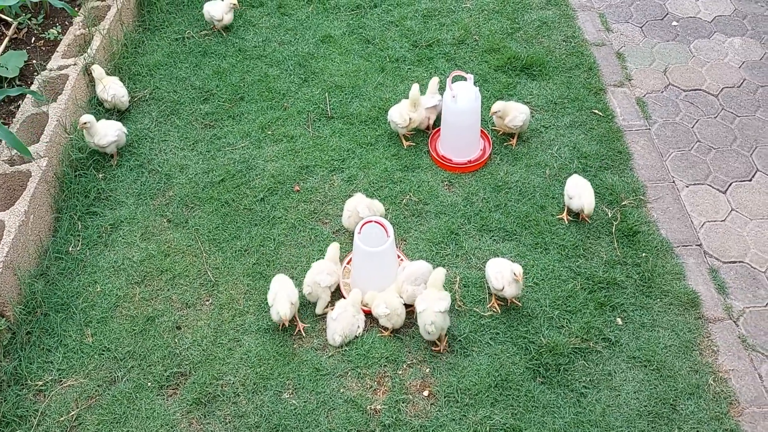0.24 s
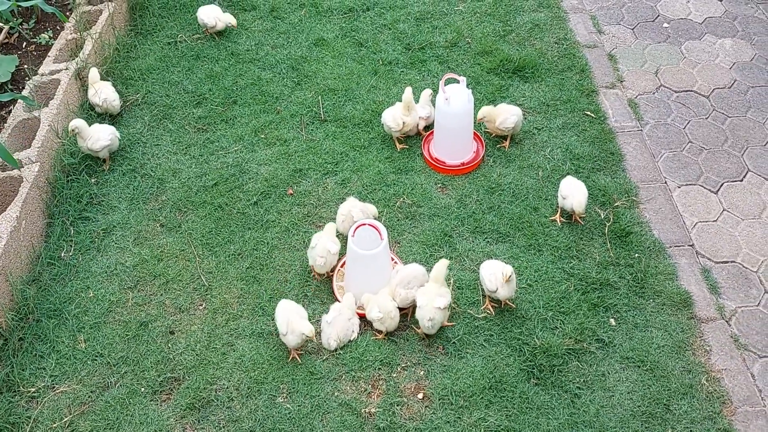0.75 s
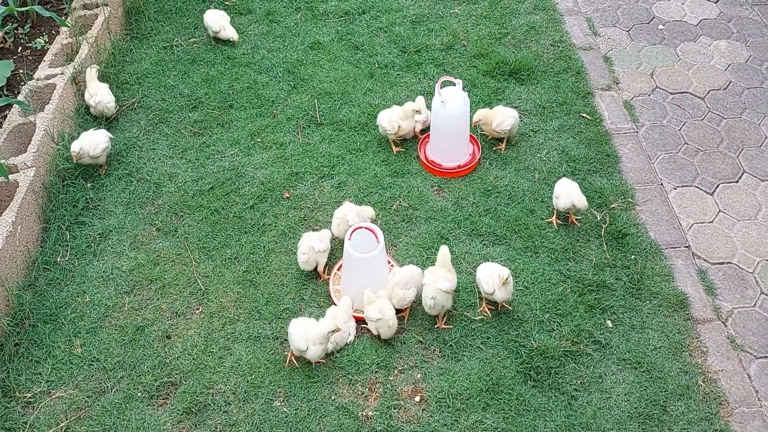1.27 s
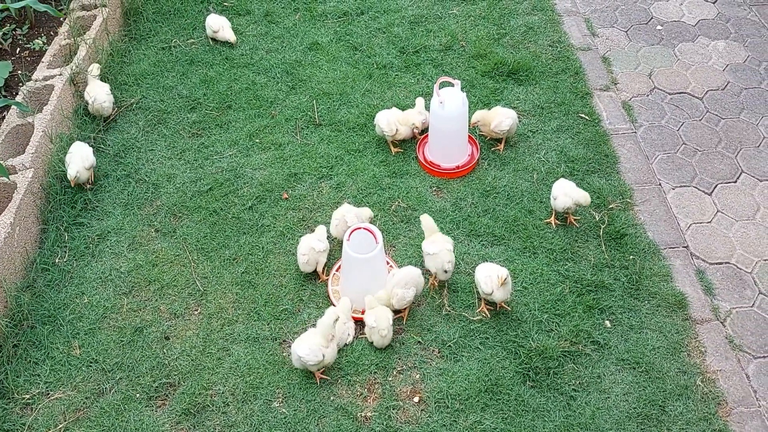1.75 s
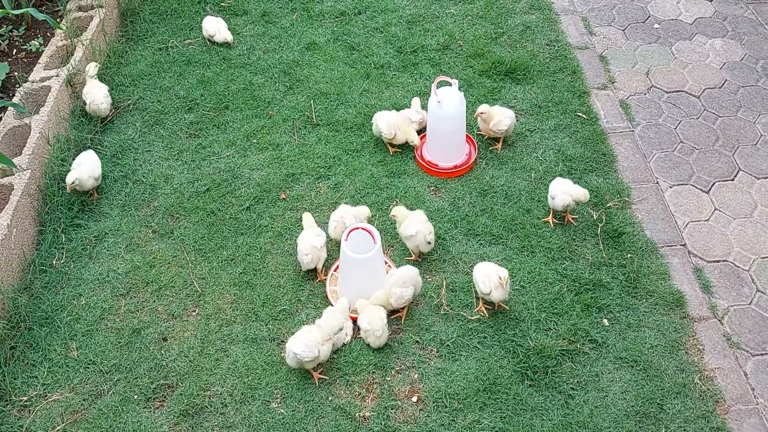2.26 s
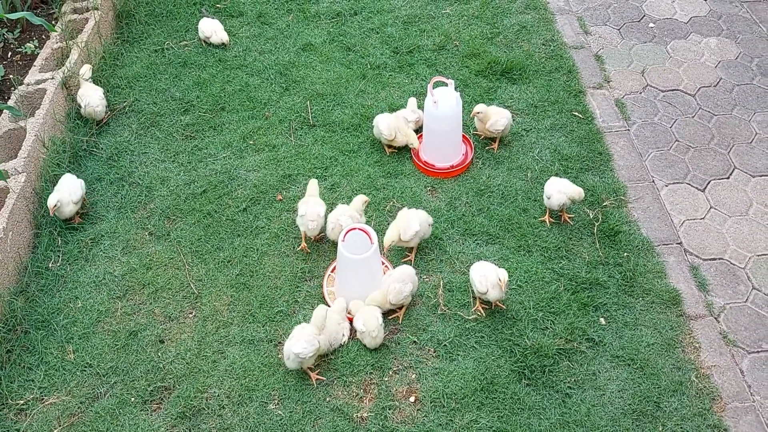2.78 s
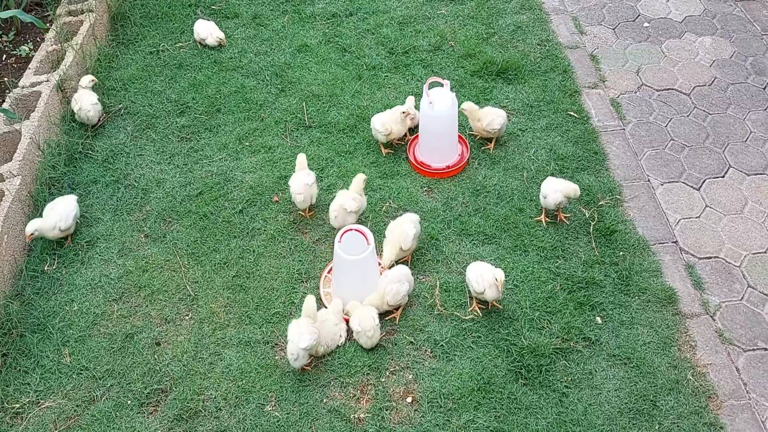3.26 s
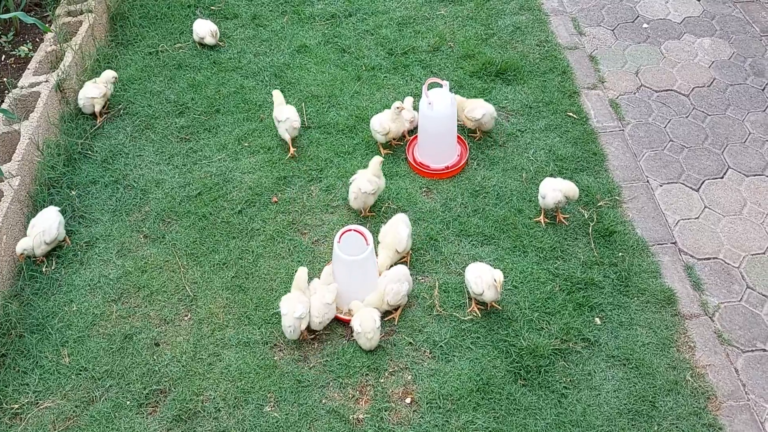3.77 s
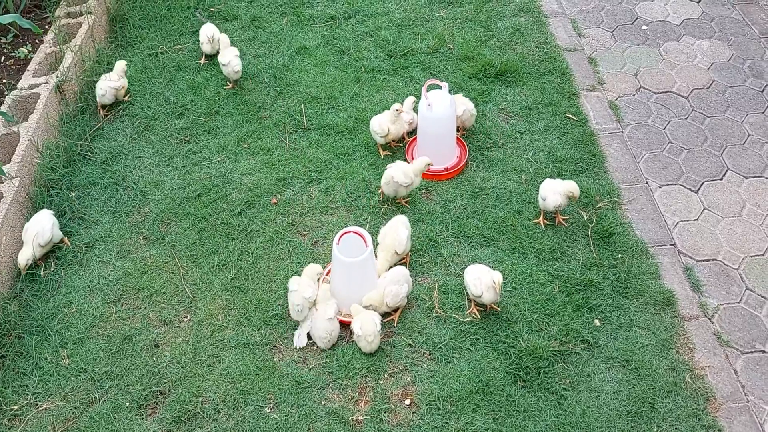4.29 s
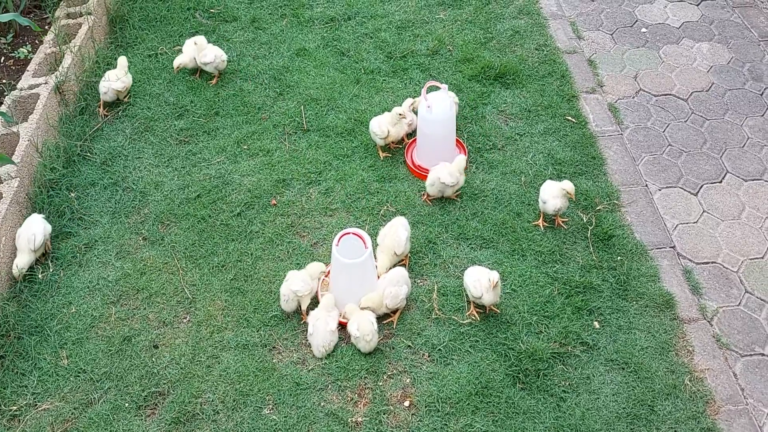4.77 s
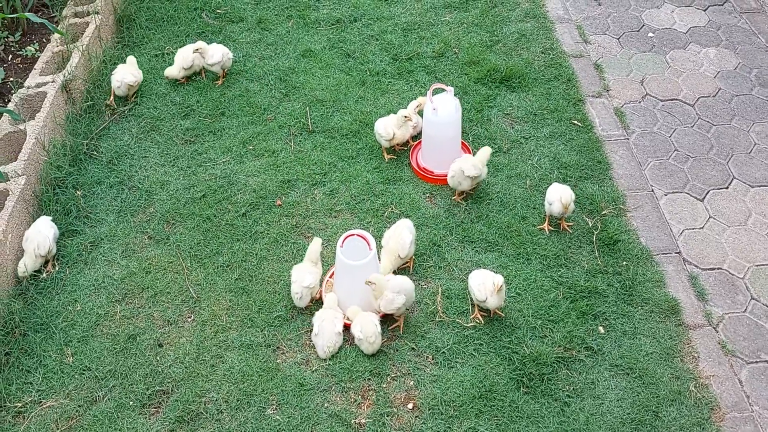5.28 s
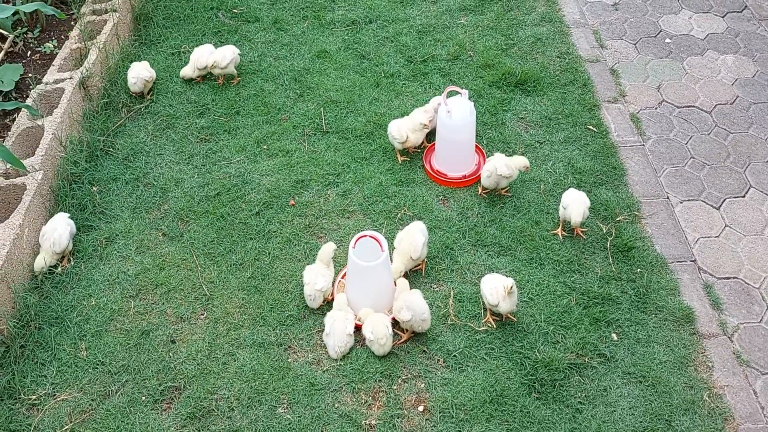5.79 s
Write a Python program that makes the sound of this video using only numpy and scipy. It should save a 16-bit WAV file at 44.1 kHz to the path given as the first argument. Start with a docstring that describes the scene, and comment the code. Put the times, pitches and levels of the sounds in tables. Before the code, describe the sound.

Thin falling peeps and quick rising chirps, light dry beak taps, and bursts of low wind buffeting in a small walled yard.

```python
"""Chicks in a walled yard

Young chicks peep and peck at a plastic feeder on a lawn, a few metres from a hand-held phone.
Their calls, long falling peeps, short rising chirps and one close arched pip, are gliding sine tones
with a faint octave; taps are damped modes with a noise scrape, and walls add discrete and diffuse echoes.
Gusts and a light breeze rumble in lumps as low noise, separate at the two microphone ports,
over tugged grass, a brief low hum, a soft airy hiss and the dull shaped noise of distant traffic."""
import sys
import numpy as np
from scipy import signal
from scipy.fft import rfft, irfft, next_fast_len
from scipy.io import wavfile
from scipy.ndimage import uniform_filter1d

SR = 44100
rng = np.random.default_rng(int(sys.argv[2]) if len(sys.argv) > 2 else 0)


def put_to_file(sound):
    """Save the sound as 16-bit audio at rate SR, in the file named by the first command-line argument."""
    columns = np.atleast_2d(sound).T  # one column per channel
    safe = np.clip(columns, -1, 1)
    whole_steps = np.round(safe * 32767)
    wavfile.write(sys.argv[1], SR, whole_steps.astype(np.int16))


N = 266231
TIME = np.arange(N) / SR
PORTS = np.array([[.5], [-.5]])  # signs of the left and right port

# falling peeps: start t/s, length/s, trailing end/s, top f/Hz, end f/Hz, relative level/dB, swell/dB,
#   opening scoop (share of the pitch, negative from above), share of the fall spent sagging (0-1),
#   place of the drop in the length (0-1), closing curl/(Hz/s), left minus right/dB, lead at the left port/ms
FALLING_PEEPS = [(.297, .095, .027, 3610, 2500, -45, 12, -.05, .62, .87, 0, 1, -.072),
                 (1.806, .069, .003, 3490, 2770, -40, 15, .15, .5, .8, 0, 0, -.067),
                 (2.347, .106, .028, 3790, 2520, -42.5, 19, 0, .75, .76, 13000, 0, -.065),
                 (3.396, .022, 0, 3980, 3450, -63.5, 0, 0, .1, .42, 0, 0, 0)]
# rising chirps: start t/s, length/s, low f/Hz, high f/Hz, relative level/dB,
#   opening height above the low pitch (share of it), share held low (0-1), swell/dB,
#   left minus right/dB, lead at the left port/ms
RISING_CHIRPS = [(.496, .029, 2270, 2890, -47, .02, .1, 17, .6, .052),
                 (1.41, .037, 2490, 3050, -43, 0, .2, 9, 2, .06),
                 (3.122, .012, 2720, 3000, -61, 0, 0, 4, 0, 0),
                 (3.396, .037, 3000, 3950, -49.5, .075, .28, 16, 1, .036),
                 (3.575, .033, 2993, 3760, -43.8, .012, .48, 1.5, 2.5, .064),
                 (4.098, .0166, 2295, 3100, -58, 0, .15, 5, 2, -.12),
                 (4.291, .032, 2270, 2800, -50, .014, .15, 8, 2, .08),
                 (4.598, .024, 3060, 3520, -59, .0065, 0, 5, 1.5, .03),
                 (5.785, .015, 2470, 2820, -58, 0, 0, 7, 1.2, 0)]
# one loud arched pip from close by: start t/s, soft low opening/s, full arch/s, low f/Hz, top f/Hz,
#   level/dB, octave overtone/dB, left minus right/dB
CLOSE_PIP = (5.0655, .0088, .028, 2270, 2950, -42.7, -12.5, 2)
# beak taps: t/s, relative level/dB, ring f/Hz
PECKS = [(.699, -40, 2900), (2.8817, -31, 2930), (3.3485, -39.5, 2320), (3.7935, -43, 2290),
         (4.119, -42, 2400), (4.8765, -38.5, 3000), (4.9408, -33, 2320), (5.4575, -45, 2700),
         (5.9127, -37.5, 2510)]
# modes that a tap rings with: multiple of the ring pitch, level/dB, t60/s
TAP_MODES = [(.69, -14, .004), (1, 0, .004), (1.25, -13, .003)]
# grass blades tugged and trodden: t/s, level/dB, centre f/Hz, t60/s
GRASS_TUGS = [(.281, -49, 6900, .035), (4.402, -51, 12500, .05), (4.675, -59, 12000, 0.065)]
# wall echoes: delay/s, level at the left port/dB, level at the right port/dB
WALL_ECHOES = [(.0082, -12, -20), (.0143, -17, -10), (.0205, -20, -22), (.033, -27, -27)]
# gusts on the ports: start t/s, length/s, level/dB, left minus right/dB
GUSTS = [(-.01, 0.082, -27, -1.5), (0.086, 0.086, -51, -20), (0.313, 0.045, -53, 6), (.93, 0.027, -50, 7),
         (0.993, 0.03, -47.5, 5), (1.225, 0.33, -46, -21), (1.624, 0.2, -53.5, -16),
         (1.794, 0.092, -42, -12), (1.985, 0.081, -53.5, -1), (2.385, .17, -53, 2), (2.795, .02, -54, 1),
         (3.273, .22, -54.5, 0), (4.225, .11, -47.5, -3.5), (4.446, 0.074, -37, 0.5),
         (4.63, 0.17, -50.5, 7), (4.869, 0.03, -34.5, 1), (4.944, 0.05, -30.5, -0.5),
         (5.022, .11, -39, 0.5), (5.15, .12, -42, -6), (5.33, 0.14, -52, -15), (5.754, 0.066, -46, -8.5),
         (5.991, .05, -45, -9)]
# the light breeze between gusts: t/s, level/dB
BREEZE = [(0, -64), (.5, -69.5), (.95, -59), (1.12, -70), (1.9, -56), (2.2, -71), (2.72, -79), (3.0, -59),
          (3.8, -57), (4.4, -52.5), (4.8, -55), (5.5, -53.5), (5.9, -60.5)]
# spectrum of the wind noise: f/Hz, relative level per Hz/dB
WIND_COLOUR = [(20, -4), (40, -4), (65, 4), (125, -.5), (190, -11), (250, -9.5), (300, -15), (400, -22.5),
               (700, -42), (1500, -52)]
# course of the distant traffic: t/s, relative level/dB
TRAFFIC_SWELL = [(0, -53), (.2, -64.5), (.95, -63), (1.52, -63.5), (1.68, -81), (1.86, -62), (2.03, -79),
                 (2.5, -69.5), (2.76, -78), (2.93, -72.5), (2.985, -54.5), (3.08, -62), (3.35, -66.5),
                 (3.45, -73), (3.95, -74), (4.3, -66.5), (4.65, -76), (5.55, -65), (6.04, -77.5)]
# spectrum of the traffic wash: f/Hz, relative level per Hz/dB
TRAFFIC_COLOUR = [(60, -21), (190, -7.5), (280, -0.5), (345, 3), (430, 0.5), (560, -5.5), (820, -4.5),
                  (1050, -14), (1400, -23), (4000, -43)]
# a brief low hum: start t/s, length/s, f/Hz, level/dB
LOW_HUM = (2.28, .31, 65, -54)
# course of the hiss: t/s, relative body level/dB, relative treble level/dB
AIR_SWELL = [(0.0, -58, -61.5), (0.15, -61.5, -63.5), (1.51, -63, -66.5), (1.7, -66.5, -70.5),
             (1.83, -62, -66.5), (2.24, -65.5, -69), (2.45, -63, -68.5), (2.74, -67.5, -72.5),
             (2.98, -64.5, -69.5), (3.63, -65.5, -64.5), (4.0, -67.5, -70), (4.39, -63.5, -68.5),
             (4.84, -66.5, -68.5), (5.01, -61.5, -65), (5.43, -63.5, -66), (6.04, -67, -71)]
# spectrum of the hiss: f/Hz, relative level per Hz/dB
AIR_COLOUR = [(150, 2.5), (1000, 0), (2500, 1.5), (4700, 0.5), (6000, -2.5), (7600, -0.45), (9400, -6.5),
              (12400, -2.5), (14500, -6), (16000, -7)]

# falling peeps
SCOOP_S, DROP_S, SAG_POWER = .007, .018, 1.8
CREST_SHARE, PEEP_FADE_DB, TRAIL_FADE_DB = .84, 8, 13
# the upward flick of a chirp, the arch of the pip
FLICK_POWER, PIP_ARCH_POWER, PIP_SWELL_POWER = 1.7, .65, 1.4
# the yard: reverberation time, and the share of the close sounds that excites the walls
YARD_T60_S, CLOSE_YARD_SHARE = .2, .55
# wind and traffic
GUST_ATTACK_S, GUST_RELEASE_S, BREEZE_PAN_DB = .01, .02, 4.5
TRAFFIC_WAVER_DB, TRAFFIC_STRAND_DB = 2.0, 2.2
# upper band limit of the phone
TOP_HZ = 15800


def falling_peep(start, length, trail, top_hz, end_hz, db, swell_db, scoop, sag, drop_at,
                 curl_hz_per_s, pan_db, lead_ms):
    """Frequency modulation: the pitch scoops, sags ever faster, slips down a step and may curl back."""
    def pitch(age):
        """Superposed glides: a sag and a drop, bent by the opening scoop and the closing curl."""
        progress = np.minimum(age / length, 1)
        drop = ease((age - drop_at * length) / DROP_S + .5)
        fall = top_hz + (end_hz - top_hz) * (sag * progress ** SAG_POWER + (1 - sag) * drop)
        opening = 1 - scoop * np.maximum(1 - age / SCOOP_S, 0) ** 2
        return fall * opening + curl_hz_per_s * np.maximum(age - length, 0)

    def level(age):
        """Amplitude envelope: swell to the crest, let go, die away."""
        swell = np.interp(age / length, [0, CREST_SHARE, 1], undb([-swell_db, 0, -PEEP_FADE_DB]))
        trailing = np.maximum(age - length, 0) / max(trail, 1e-3)
        return db + 20 * np.log10(swell) - TRAIL_FADE_DB * trailing

    return whistle(start, length + trail, pitch, level, pan_db, lead_ms, octave_db=-31)


def rising_chirp(start, length, low_hz, high_hz, db, opening, held, swell_db, pan_db, lead_ms,
                 crest=0.8, fade_db=3):
    """Frequency modulation: a short note settles low, swells and flicks upward."""
    def pitch(age):
        """Two glides in turn: down to the low pitch, then up to the high one."""
        progress = age / length
        settling = 1 - ease(progress / max(held, .01))
        return low_hz * (1 + opening * settling) + (high_hz - low_hz) * glide(progress, held)

    def level(age):
        """Amplitude envelope: straight lines in dB up to the crest and down again."""
        return db - np.interp(age / length, [0, crest, 1], [swell_db, 0, fade_db])

    return whistle(start, length, pitch, level, pan_db, lead_ms)


def arched_pip(start, opening, length, low_hz, top_hz, db, octave_db, pan_db, swell_db=20):
    """Common drive: after a soft low opening one push of effort lifts pitch and level together."""
    def effort(age):
        """Half-sine drive over the full arch."""
        return np.sin(np.pi * np.clip((age - opening) / length, 0, 1))

    def pitch(age):
        """Pitch rising with a power of the effort."""
        return low_hz + (top_hz - low_hz) * effort(age) ** PIP_ARCH_POWER

    def level(age):
        """Level rising with the effort from a soft floor."""
        return db + 20 * np.log10(np.maximum(effort(age) ** PIP_SWELL_POWER, undb(-swell_db)))

    # the note ends before the arch is complete
    return whistle(start, opening + .88 * length, pitch, level, pan_db, 0, octave_db, edge_s=.004)


def whistle(start, length, pitch_hz, level_db, pan_db, lead_ms, octave_db=-26, edge_s=.005,
            waver=0.007, flutter_db=1.3):
    """Phase integration: a nearly pure tone of the syrinx whose pitch and level are laws of its age."""
    span = (TIME > start - edge_s) & (TIME < start + length + edge_s)
    age = TIME[span] - start
    sounding = np.clip(age, 0, length)
    pitch = pitch_hz(sounding) * (1 + waver * walk(400)[span])
    gate = ease(np.minimum(age, length - age) / edge_s + 1)
    # the arrival lead becomes a phase difference between the ports
    phase = 2 * np.pi * (np.cumsum(pitch) / SR + PORTS * pitch * lead_ms / 1000)
    level = level_db(sounding)
    # the octave only comes through near the loudest moment
    octave = undb(octave_db + level - level.max())
    tone = np.sqrt(2) * (np.sin(phase) + octave * np.sin(2 * phase))
    out = np.zeros((2, N))
    out[:, span] = tone * gate * undb(level + flutter_db * walk(250)[span]) * pan(pan_db)
    return out


def taps(rows, scrape_db=-11, scrape_s=0.0024):
    """Damped modes: each tap rings for a few cycles while the beak scrapes briefly over the grain."""
    out, t = np.zeros((2, N + SR)), np.arange(SR // 40) / SR
    onset = 1 - np.exp(-t / 0.00016)
    for s, db, hz in rows:
        ring = sum(undb(mode_db - 60 * t / t60) * np.sin(2 * np.pi * hz * multiple * t)
                   for multiple, mode_db, t60 in TAP_MODES)
        scrape = unit(band(rng.standard_normal((2, len(t))), 0.53 * hz, 1.6 * hz))
        scrape = scrape * np.exp(-t / scrape_s)
        i = max(int(s * SR), 0)
        out[:, i:i + len(t)] += (ring + undb(scrape_db) * scrape) * onset * undb(db)
    return out[:, :N]


def nibbling(count=30, level_db=-54, spread_db=3, ring_hz=3000):
    """Random impacts: the rest of the flock picks faintly at grain and grass."""
    rows = []
    for when, strength, size in rng.random((count, 3)):
        db = level_db + spread_db * (2 * strength - 1)
        rows.append((when * N / SR, db, ring_hz * 2 ** (1.54 * size - .6)))
    return taps(rows)


def grass(crackle_db=3):
    """Decaying noise: each tug tears a few fibres in a short, bright, uneven rustle."""
    out = np.zeros((2, N))
    for s, db, hz, t60 in GRASS_TUGS:
        age = np.maximum(TIME - s, 0)
        fibres = unit(band(rng.standard_normal((2, N)), 0.58 * hz, 1.35 * hz))
        decay = undb(db - 60 * age / t60 + crackle_db * walk(500))
        out += fibres * np.minimum(age / 0.0043, 1) * decay
    return out


def yard(x, tail_db=-11.5):
    """Reflection by convolution: distinct echoes off the near walls with a short scattered tail."""
    t = np.arange(SR // 2) / SR
    tail = rng.standard_normal((2, len(t))) * undb(-60 * t / YARD_T60_S) * np.clip(t / 0.0066, 0, 1)
    response = tail * undb(tail_db) / np.sqrt(np.sum(tail ** 2) / 2)
    for delay, left_db, right_db in WALL_ECHOES:
        response[:, int(delay * SR)] += undb([left_db, right_db])
    return x + signal.fftconvolve(x, response, axes=1)[:, :N]


def wind(brighten=0.32, knee_db=-42, split_hz=170):
    """Turbulence: eddies buffet each port separately; stronger gusts shed more of the smaller eddies."""
    force_db = wind_force()
    eddies = noise(WIND_COLOUR, 0)
    # the eddies come in an even stream, so the wind force alone sets their strength
    eddies = eddies / np.sqrt(uniform_filter1d(eddies ** 2, size=2600) + 1e-9)
    large = signal.sosfiltfilt(signal.butter(2, split_hz, fs=SR, output="sos"), eddies)
    small = (eddies - large) * undb(brighten * (force_db - knee_db))
    return (large + small) * undb(force_db)


def wind_force(gust_buffet_db=3, breeze_buffet_db=6, buffet_rate=28, ceiling=.6):
    """Energy addition: gusts and breeze combine at each port, in dB, in lumps with deep gaps."""
    breeze_db, = curves(BREEZE)
    gusts = 0
    for start, length, db, pan_db in GUSTS:
        rise = ease((TIME - start) / GUST_ATTACK_S)
        release = np.exp(-np.maximum(TIME - start - length, 0) / GUST_RELEASE_S)
        gusts = np.hypot(gusts, rise * release * undb(db) * pan(pan_db))
    # capped peaks leave the dips deeper than the lumps are high
    lumps = np.minimum([walk(buffet_rate), walk(buffet_rate)], ceiling)
    breeze = undb(breeze_db + breeze_buffet_db * lumps) * pan(BREEZE_PAN_DB)
    return 20 * np.log10(np.hypot(gusts * undb(gust_buffet_db * lumps), breeze))


def traffic(level_db=5.0, likeness=0.68, strand_rate=9):
    """Partial coherence: a dull wash, much alike at both ports, wavers whole and in narrow strands."""
    swell_db, = curves(TRAFFIC_SWELL)
    wash = noise(TRAFFIC_COLOUR, likeness)
    size = next_fast_len(N)
    spectrum, hz = rfft(wash, size), np.fft.rfftfreq(size, 1 / SR)
    centres = np.linspace(200, 1100, 16)
    strands = 0
    # overlapping triangular bands; the outermost two also take all below and above
    for pick in np.eye(len(centres)):
        strand = irfft(spectrum * np.interp(hz, centres, pick), size)[:, :N]
        strands = strands + strand * undb(TRAFFIC_STRAND_DB * walk(strand_rate))
    return unit(strands) * undb(swell_db + level_db + TRAFFIC_WAVER_DB * walk(28))


def hum(start, length, hz, db):
    """Simple harmonic tone: a low hum swells and fades once."""
    swell = np.sin(np.pi * np.clip((TIME - start) / length, 0, 1))
    return np.sqrt(2) * np.sin(2 * np.pi * hz * TIME) * swell * undb(db)


def air(body_db=7.0, top_db=10, flicker_db=0.87, split_hz=9000, top_flicker_db=1.2, top_pan_db=-1.5):
    """Diffuse noise: a soft hiss, unalike at the ports, rises and falls; its top flickers on its own."""
    hiss_db, treble_db = curves(AIR_SWELL)
    hiss = noise(AIR_COLOUR, 0)
    body = signal.sosfiltfilt(signal.butter(4, split_hz, fs=SR, output="sos"), hiss)
    top_gain = undb(treble_db + top_db + top_flicker_db * walk(24.8))
    top = (hiss - body) * top_gain * pan(top_pan_db)
    return body * undb(hiss_db + body_db + flicker_db * walk(30)) + top


def noise(colour, likeness):
    """Spectral shaping: coloured stereo noise; likeness is the correlation between the ports."""
    hz, db = np.transpose(colour)
    size = next_fast_len(N)
    f = np.maximum(np.fft.rfftfreq(size, 1 / SR), 1)
    gain = undb(np.interp(np.log(f), np.log(hz), db, right=-120))
    gain = gain * np.minimum(f / hz[0], 1) ** 2  # roll off below the first point
    mid, side = irfft(rfft(rng.standard_normal((2, size))) * gain, size)[:, :N]
    return unit(np.sqrt(1 + likeness) * mid + np.sqrt(1 - likeness) * np.array([side, -side]))


def band(x, low_hz, high_hz):
    """Band limitation: a gentle band-pass."""
    return signal.sosfilt(signal.butter(2, [low_hz, high_hz], "band", fs=SR, output="sos"), x)


def walk(rate):
    """Smoothed random steps: a wander of rms 1 with about rate new steps per second."""
    k = max(int(SR / rate), 1)
    steps = np.repeat(rng.standard_normal(N // k + 1), k)
    return unit(uniform_filter1d(uniform_filter1d(steps, k), k)[:N])


def curves(rows):
    """Linear interpolation: the columns of a table as one value per sample."""
    s, *columns = np.transpose(rows)
    return [np.interp(TIME, s, column) for column in columns]


def glide(progress, held):
    """Delayed transition: stay at 0 for the held share of a call, then rise and settle at 1."""
    moving = np.clip((progress - held) / max(1 - held, 1e-3), 0, 1)
    return ease(moving ** FLICK_POWER)


def ease(x):
    """Sine-squared transition: a smooth step from 0 to 1."""
    return np.sin(np.pi / 2 * np.clip(x, 0, 1)) ** 2


def pan(db):
    """Level difference at constant power: left and right gains, left minus right in dB."""
    return unit(undb(PORTS * db))


def undb(db):
    """Logarithmic level: decibels to amplitude gain."""
    return 10 ** (np.asarray(db) / 20)


def unit(x):
    """Normalisation: scale to an rms of 1."""
    return x / np.sqrt(np.mean(x ** 2))


def scene(peep_db=-0.9, peck_db=-0.7):
    """Superposition: the flock in its yard, with close sounds waking the walls less, over the background."""
    peeps = sum(falling_peep(*row) for row in FALLING_PEEPS)
    chirps = sum(rising_chirp(*row) for row in RISING_CHIRPS)
    beaks = band(taps(PECKS) + nibbling(), 1500, 3700)
    close = arched_pip(*CLOSE_PIP) + undb(peck_db) * beaks
    reflected = yard(undb(peep_db) * (peeps + chirps) + CLOSE_YARD_SHARE * close + grass())
    flock = reflected + (1 - CLOSE_YARD_SHARE) * close
    return flock + wind() + traffic() + hum(*LOW_HUM) + air()


def record(dry):
    """Band limitation: the phone cuts the top with a steep elliptic low-pass."""
    return signal.sosfilt(signal.ellip(12, .1, 80, TOP_HZ, fs=SR, output="sos"), dry)


dry = scene()
out = record(dry)
put_to_file(out)
```